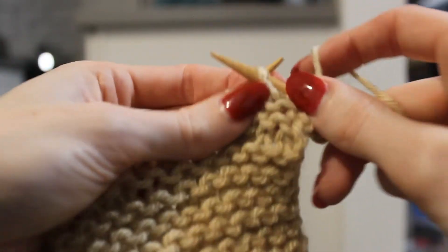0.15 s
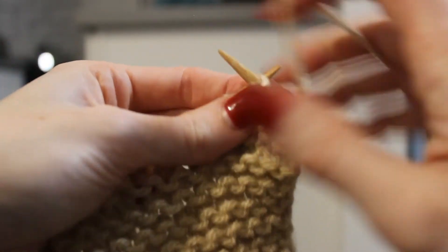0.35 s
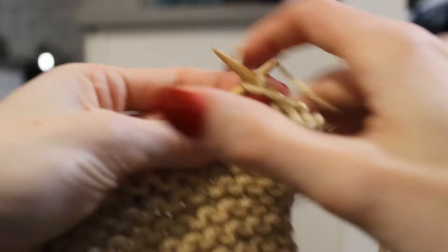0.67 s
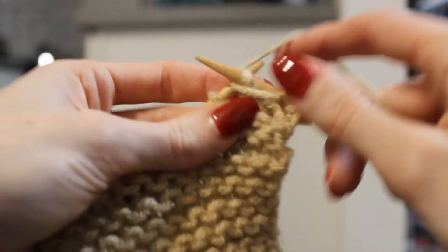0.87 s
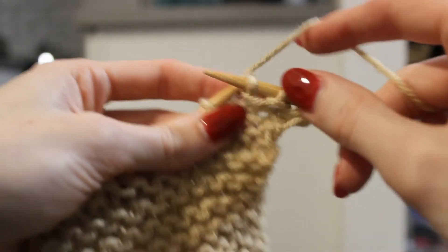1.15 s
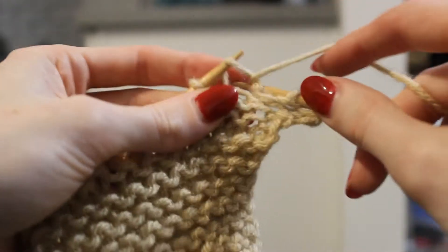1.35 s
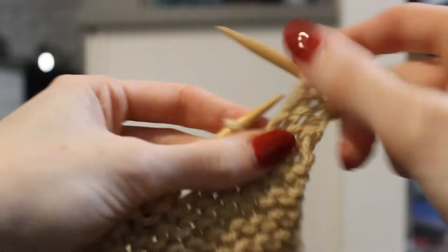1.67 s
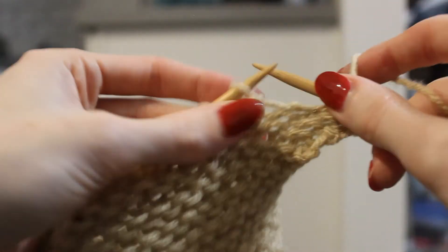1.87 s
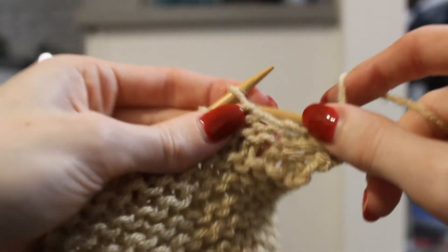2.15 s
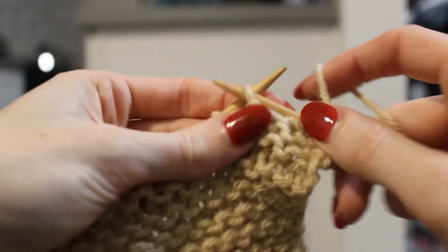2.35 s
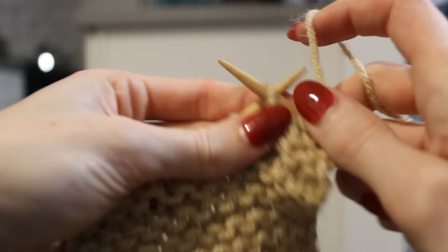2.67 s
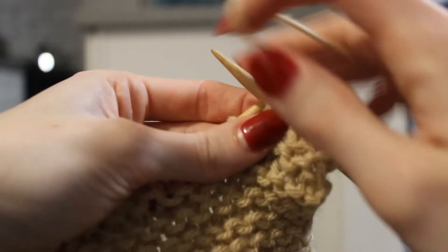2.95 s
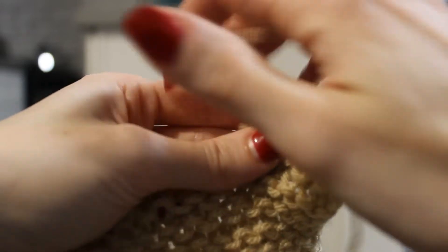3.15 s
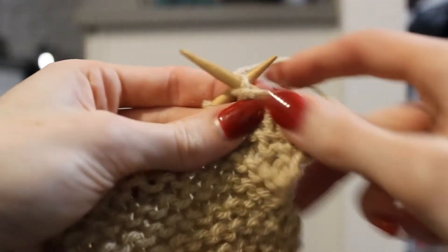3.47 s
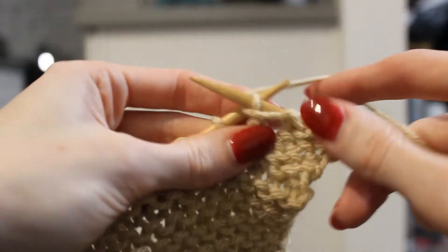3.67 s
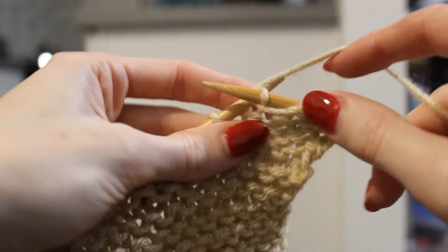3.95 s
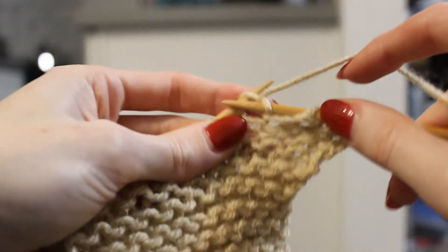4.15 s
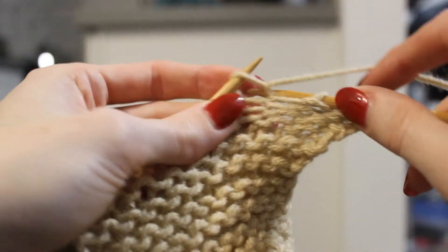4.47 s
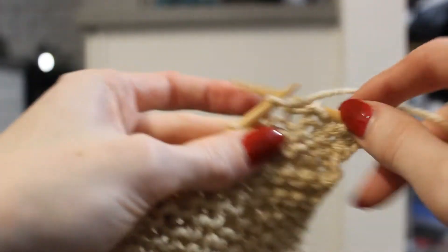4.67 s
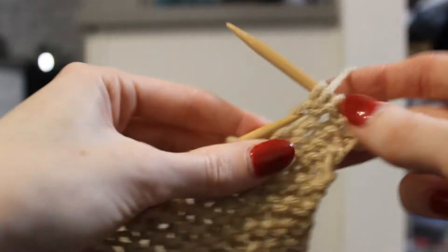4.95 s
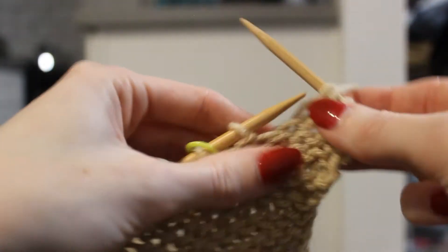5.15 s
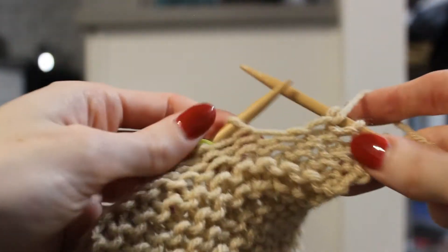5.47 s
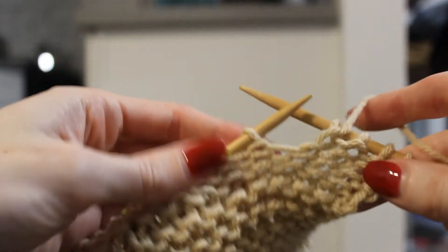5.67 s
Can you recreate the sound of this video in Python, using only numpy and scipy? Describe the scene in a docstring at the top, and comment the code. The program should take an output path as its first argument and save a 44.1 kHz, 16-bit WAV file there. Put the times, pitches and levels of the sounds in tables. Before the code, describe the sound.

Close, nearly centred sound of wooden knitting needles in a small room, over steady faint hiss and a very weak, slightly wavering low hum. A dry wool scrape opens the scene, then at 0.35 s a hard, bright wooden clack, by far the loudest event, with a short room tail; the background dips just after and recovers. A much softer, dull knock follows at 0.5 s. Tiny ticks and short fibrous rubs come from 0.65 to 1.2 s, then a muffled fabric bump and longer scrape near 1.45 s. A crisp click at 2.24 s stands out, leading into a smooth yarn hiss that swells until about 2.9 s and fades by 3.3 s, with a cushioned tap at 3.1 s. Small rubs and a soft bump occur around 3.5 s, faint ticks and a muted knock at 4.0-4.4 s, then scrapes from 4.6 to 5.65 s, ending in quiet air.

```python
"""Wooden needles knitting

Two wooden needles work a row of stitches close to the microphone in a small room, over hiss and faint mains hum.
Knocks of the shafts are sums of decaying modes plus a crack; ticks and wool scrapes are noise bursts and random
clicks through tip resonances; yarn over a finger and hand bumps are shaped, filtered noise.
The room is decaying banded noise; the loudest knock makes the recorder's limiter duck."""
import sys
import numpy as np
from scipy import signal
from scipy.fft import rfft, irfft
from scipy.io import wavfile
from scipy.ndimage import uniform_filter1d

SR = 44100
rng = np.random.default_rng(int(sys.argv[2]) if len(sys.argv) > 2 else 0)


def int16_out(signal):
    """Quantize to a 16-bit WAV file."""
    q = np.round(np.clip(np.atleast_2d(signal).T, -1, 1) * 32767)
    wavfile.write(sys.argv[1], SR, q.astype(np.int16))


N = 255780
TIME = np.arange(N) / SR


def from_db(db):
    """Decibels to amplitude gain."""
    return 10 ** (np.asarray(db) / 20)


def rms_one(x):
    """Scale to unit power."""
    return x / np.sqrt(np.mean(x ** 2) + 1e-20)


def at_hz(points, hz, axis=1):
    """Interpolate a table column on a log-frequency axis."""
    points = np.array(points)
    return np.interp(np.log(np.maximum(hz, 1)), np.log(points[:, 0]), points[:, axis])


def cut(x, hz, kind, order=2):
    """Butterworth filter."""
    sos = signal.butter(order, np.clip(hz, 10, .48 * SR), kind, fs=SR, output="sos")
    return signal.sosfilt(sos, x + 1e-18)


def drift(rate_hz):
    """Slow random curve of rms 1: straight lines between random knots."""
    knots = rng.standard_normal(2000)
    return rms_one(np.interp(TIME * rate_hz, np.arange(len(knots)), knots))


def add(track, start_s, sound):
    """Mix a sound into a track at a time."""
    at = int(round(start_s * SR))
    track[at:at + len(sound)] += sound[:N - at]


def push(start_s, length_s, attack_s, release_s):
    """Gain of a hand movement: linear attack, hold, linear release after length_s."""
    attack = np.clip((TIME - start_s) / attack_s, 0, 1)
    release = np.clip(1 - (TIME - start_s - length_s) / release_s, 0, 1)
    return attack * release


# left-right likeness of diffuse noise: f/Hz, correlation
LIKENESS = [(60, 0.99), (130, 0.99), (290, 0.97), (640, 0.89), (1410, 0.6), (3100, 0.45), (6820, 0.32),
            (15000, 0.098)]


def noise(colour):
    """Coloured stereo noise, mid and side weighted for channels most alike in the bass; rms 1."""
    hz = np.arange(N // 2 + 1) * SR / N
    mid, side = rfft(rng.standard_normal((2, N))) * from_db(at_hz(colour, hz))
    alike = np.clip(at_hz(LIKENESS, hz), 0, 1)
    spectrum = np.sqrt(1 + alike) * mid + np.sqrt(1 - alike) * side * [[1], [-1]]
    return rms_one(irfft(spectrum, N))


# spectrum of still air and microphone hiss: f/Hz, relative density/dB
AIR_COLOUR = [(13, -64), (22, -20.5), (61, -6.5), (87, -6), (117, -4), (146, -6.5), (282, -10), (530, -15),
              (592, -16.5), (801, -17), (869, -19), (2990, -25), (4270, -24.5), (6620, -25.5),
              (15500, -27.5)]
AIR_DB = -48.5
HUM_HZ, HUM_DB = 118.7, -60.5


def background(waver_db=-2.0, wander_rad=0.22):
    """Still air and hiss as coloured noise; mains hum as a sine wavering in phase and level."""
    phase = 2 * np.pi * HUM_HZ * TIME + wander_rad * drift(5.7)
    hum = np.sqrt(2) * np.sin(phase) * from_db(waver_db * drift(5.9))
    return from_db(AIR_DB) * noise(AIR_COLOUR) + from_db(HUM_DB) * hum


# resonances of a needle tip: f/Hz, width/Hz, level/dB
TIP_MODES = [(4530, 4000, -2.5), (5630, 770, 6.5), (6650, 720, 1), (7830, 1340, -2), (11500, 1900, -9.5),
             (13700, 1200, -11.5)]


def tip(clicks):
    """A needle tip's broad resonances: parallel band-pass filters of alternating sign."""
    out = 0
    for k, (hz, width_hz, db) in enumerate(TIP_MODES):
        resonator = signal.iirpeak(hz, hz / width_hz, fs=SR)
        out = out + (-1) ** k * from_db(db) * signal.lfilter(*resonator, clicks + 1e-18)
    return out


# needle pushed through wool: t/s, length/s, level before trim and sag/dB, fibre crackle/dB
STROKES = [(0.007, 0.26, -54.5, -22), (0.758, 0.051, -54.5, -14), (0.904, 0.043, -54.5, -18),
           (1.11, 0.11, -56, -21), (1.45, 0.3, -54.5, -11), (1.766, 0.045, -55, -24), (2.11, .14, -60, -19),
           (2.25, 0.094, -51.5, -18), (2.37, .32, -56.5, -22), (2.685, 0.066, -52.5, -17),
           (3.41, .04, -54, -19), (3.492, 0.056, -54, -19), (4, .04, -57, -22), (4.621, 0.2, -51.5, -17),
           (4.84, .08, -49, -12), (4.95, 0.045, -57, -22), (5.085, .06, -56.5, -24), (5.2, 0.31, -55, -23),
           (5.277, .05, -55, -21), (5.631, .035, -51.5, -17)]
STROKE_ATTACK_S, STROKE_RELEASE_S, STROKE_SAG_DB_PER_S = 0.023, .045, 6


def stitches(catches_per_s=4500, size_db=1.5, uneven_db=1.5, trim_db=-2.5, fibre_hz=2400):
    """Wool fibres catch and let go: random clicks excite the tip, high-passed ones add fibre crackle."""
    out = np.zeros(N)
    for start_s, length_s, db, fibre_db in STROKES:
        catches = (rng.random(N) < catches_per_s / SR) * rng.choice([-1, 1], N)
        catches = catches * from_db(size_db * np.minimum(rng.exponential(1, N), 4))
        fibres = from_db(fibre_db) * cut(catches, fibre_hz, "high")
        rub = rms_one(tip(catches) + fibres)
        effort = from_db(db - STROKE_SAG_DB_PER_S * np.maximum(TIME - start_s, 0))
        out += rub * effort * push(start_s, length_s, STROKE_ATTACK_S, STROKE_RELEASE_S)
    return out * from_db(trim_db + uneven_db * drift(60))


# room answer: f/Hz, relative level/dB, t60/s
ROOM = [(203, -6, 0.34), (450, -12, 0.29), (690, -2, 0.2), (1100, -3.5, 0.3), (2200, -0.5, 0.38),
        (3360, -1, .48), (5000, 0.5, 0.38), (6360, -4.5, 0.2), (8500, -11.5, 0.41), (14000, -9, 0.21)]


def room(x, first_s=0.0012, early_db=8, early_s=0.0077, side_db=-20, level_db=-31):
    """Dense reflections, strongest early: noise bands, each with its own exponential decay."""
    t, edges_hz = TIME[:SR * 3 // 4], np.geomspace(150, 16000, 15)
    white, answer = rng.standard_normal((2, 2, len(t))), 0
    for k, band in enumerate(zip(edges_hz, edges_hz[1:])):
        hz = np.sqrt(band[0] * band[1])
        decay_db = at_hz(ROOM, hz) - 60 * t / at_hz(ROOM, hz, axis=2)
        # neighbouring bands draw on different noise
        answer = answer + cut(white[k % 2], band, "band") * from_db(decay_db)
    shape = np.clip(t / first_s - .5, 0, 1) * from_db(early_db * np.exp(-t / early_s))
    mid, side = signal.fftconvolve(x[None], answer * shape * from_db(level_db), axes=1)[:, :N]
    return mid + from_db(side_db) * side * [[1], [-1]]


def ring(modes, t, place=0, build_cycles=4.6):
    """Bending modes build up over a few cycles and die; a node near the struck place weakens a mode."""
    out = 0
    for k, (hz, db, t60_s) in enumerate(modes):
        coupling = (-1) ** k * abs(np.cos(np.pi * (k + 1) * place))
        build = 1 - np.exp(-hz * t / build_cycles)
        out = out + coupling * from_db(db - 60 * t / t60_s) * build * np.sin(2 * np.pi * hz * t)
    return out


# shaft knocks: t/s, free needle/dB, gripped needle/dB, place on gripped needle/share of length,
# contact crack/dB, contact low-pass f/Hz, crack to room/dB, ring to room/dB (all levels relative)
KNOCKS = [(0.3495, 6, -4, .02, -4, 9450, 4, -15.5), (0.4851, -21, -13.5, 0.071, -15, 3800, -10.5, -13),
          (3.1162, -36, -12, 0.013, -17.5, 2900, -12.5, -4),
          (4.3688, -31, -14, 0.34, -14, 3200, -12.5, -12)]
# modes of the loosely held needle: f/Hz, level/dB, t60/s
FREE_NEEDLE = [(411, -46, 0.57), (470, -49, .45), (824, -27, 0.056), (1080, -23, 0.039), (1277, -11, 0.026),
               (1806, -9, 0.02), (2420, -15, 0.036), (2654, -11.5, 0.022), (3030, -12.5, 0.032),
               (3416, -5.5, 0.027), (3874, -9.5, 0.025), (4560, -9.5, 0.022), (5140, -10, 0.017),
               (5830, -3, 0.015), (7250, -8, 0.0065), (8530, -10.5, 0.0083), (10300, -20.5, 0.012),
               (11430, -10.5, 0.0073)]
# modes of the finger-damped needle: f/Hz, level/dB, t60/s
GRIPPED_NEEDLE = [(395, -28.5, 0.11), (684, -19.5, 0.088), (922, -9, 0.025), (1045, -29.5, 0.069),
                  (1365, -19, 0.044), (1520, -27.5, 0.051), (2141, -12.5, 0.037), (2437, -22, 0.044),
                  (3500, -19, 0.022), (4850, -6, 0.019)]


def knocks(crack_s=.00007, lowest_hz=520):
    """Both shafts ring and crack, duller when wool cushions the contact; returns direct and room feed."""
    t, direct, spread = TIME[:SR // 2], np.zeros(N), np.zeros(N)
    crack = 2 * cut(np.exp(-t / crack_s), lowest_hz, "high", order=4)
    for s, free_db, gripped_db, place, crack_db, contact_hz, crack_room_db, ring_room_db in KNOCKS:
        free = from_db(free_db) * ring(FREE_NEEDLE, t)
        gripped = from_db(gripped_db) * ring(GRIPPED_NEEDLE, t, place)
        wood = free + gripped
        add(direct, s, cut(wood + from_db(crack_db) * crack, contact_hz, "low", order=3))
        # the broad crack spreads in all directions, so the room's tail is smooth
        to_room = from_db(ring_room_db) * wood + from_db(crack_room_db) * crack
        add(spread, s, cut(to_room, contact_hz, "low", order=4))
    return direct, spread


# tips slip off each other: t/s, peak level/dB
TICKS = [(0.657, -35.5), (0.932, -41), (1.670, -38), (2.138, -43), (2.2400, -24), (3.993, -39), (4.17, -35),
         (4.378, -35.5), (5.590, -40)]


def ticks(scratch_db=-21, scratch_s=0.014, lowest_hz=4400, slip_s=.0009):
    """A faint scratch surrounds a sub-millisecond slip of friction noise; too small to radiate lows."""
    lead = SR // 40
    t, out = np.arange(-lead, lead) / SR, np.zeros(N)
    slip_gain = (t >= 0) * np.exp(-np.abs(t) / slip_s)
    scratch_gain = from_db(scratch_db) * np.exp(-np.abs(t) / scratch_s)
    for s, db in TICKS:
        friction = rng.standard_normal(len(t)) * (slip_gain + scratch_gain)
        tick = cut(tip(friction), lowest_hz, "high")
        add(out, s + t[0], from_db(db) * tick / np.abs(tick).max())
    return out


# hands bump the knitting: centre t/s, level/dB, Gaussian sigma/s, lowest f/Hz, highest f/Hz
BUMPS = [(1.417, -47, 0.027, 110, 950), (1.45, -47.5, 0.022, 90, 338), (3.529, -49.5, 0.0069, 450, 960)]


def bumps():
    """Soft, muffled pushes of fingers on fabric: band-limited noise under a Gaussian envelope."""
    out = np.zeros(N)
    for s, db, sigma_s, low_hz, high_hz in BUMPS:
        muffled = cut(rng.standard_normal(N), high_hz, "low", order=4)
        thud = rms_one(cut(muffled, low_hz, "high"))
        out += from_db(db) * thud * np.exp(-.5 * ((TIME - s) / sigma_s) ** 2)
    return out


# spectrum of yarn on skin: f/Hz, relative level/dB
YARN_COLOUR = [(1500, -36), (2700, -3.5), (3900, -8), (4600, -1.5), (5100, 2), (6100, -3.5), (7500, -22),
               (14000, -26)]
# one pull; level at its fastest
YARN_START_S, YARN_RISE_S, YARN_FALL_S, YARN_DB = 2.425, 0.45, 0.41, -53.5


def yarn():
    """Strand over skin: smooth hiss swelling and fading with the speed of the pull."""
    speed = push(YARN_START_S, YARN_RISE_S, YARN_RISE_S, YARN_FALL_S)
    return from_db(YARN_DB) * speed * noise(YARN_COLOUR)


def scene(tip_room_db=-12):
    """Hands and needles sit straight in front of the microphone; knocks and tips also feed the room."""
    direct, spread = knocks()
    tips = ticks() + stitches()
    reflections = room(spread + from_db(tip_room_db) * tips)
    return direct + tips + reflections + yarn() + bumps() + background()


CUTOFF_HZ = 15850


def record(dry, limit_db=0.0, release_db_per_s=18, top=1.02):
    """Fast limiter with slow linear-in-dB recovery, rounded peaks, steep low-pass."""
    over_db = np.maximum(20 * np.log10(np.abs(dry).max(axis=0) + 1e-9) - limit_db, 0)
    release_db = release_db_per_s * TIME
    duck_db = np.maximum.accumulate(over_db + release_db) - release_db
    held = dry * uniform_filter1d(from_db(-duck_db), size=32)
    rounded = held / (1 + (held / top) ** 4) ** (1 / 4)
    low_pass = signal.ellip(10, .1, 80, CUTOFF_HZ, fs=SR, output="sos")
    return signal.sosfilt(low_pass, rounded)


dry = scene()
out = record(dry)
int16_out(out)
```